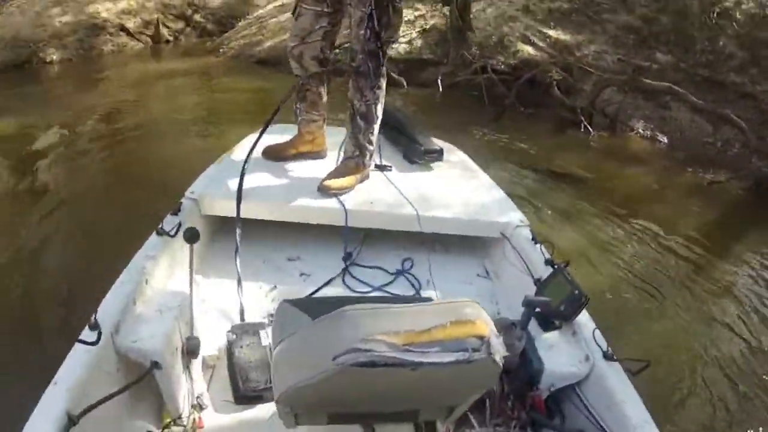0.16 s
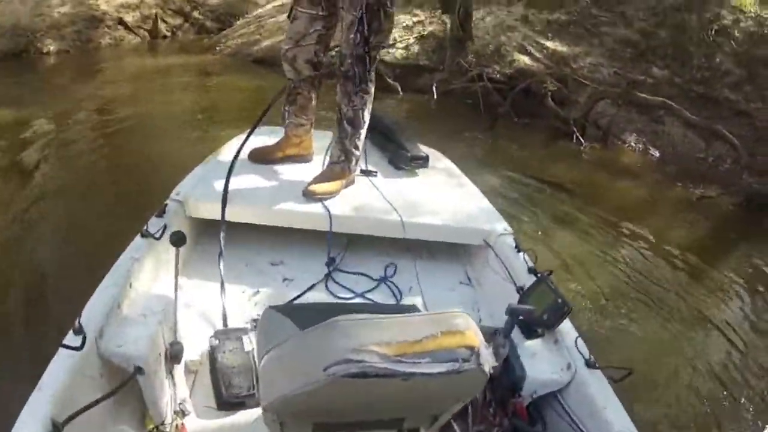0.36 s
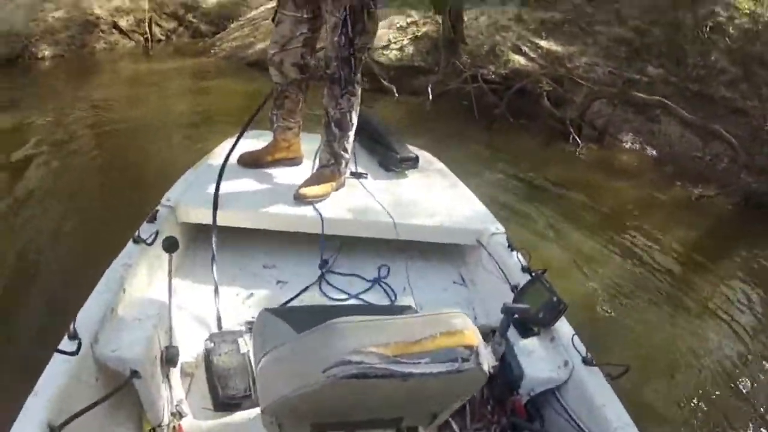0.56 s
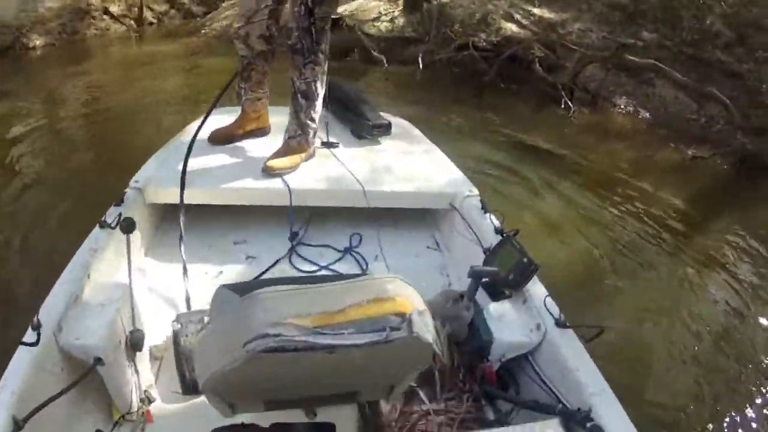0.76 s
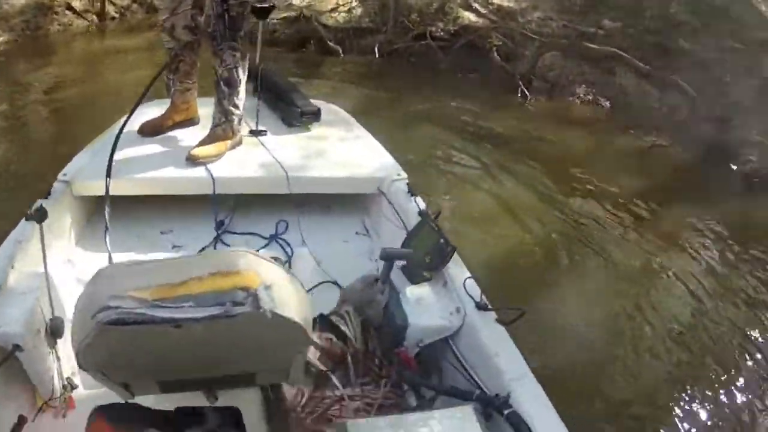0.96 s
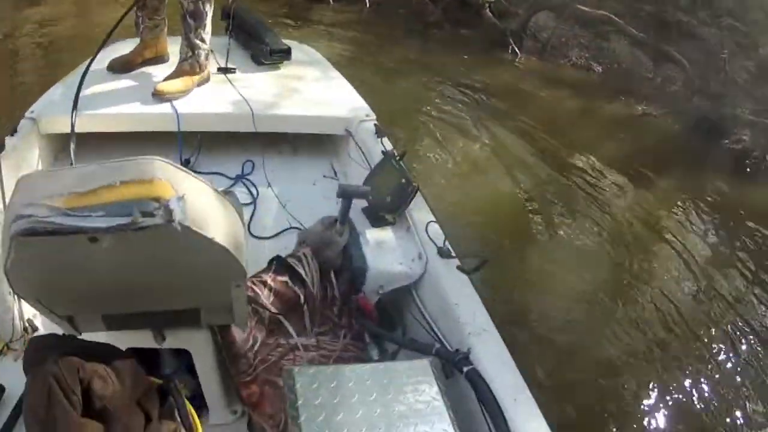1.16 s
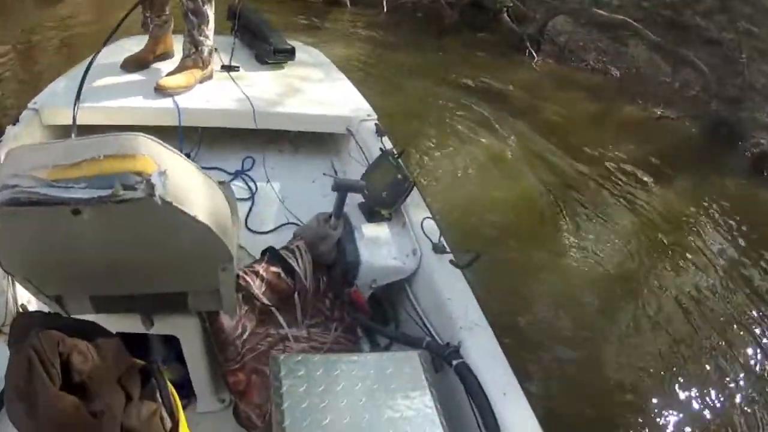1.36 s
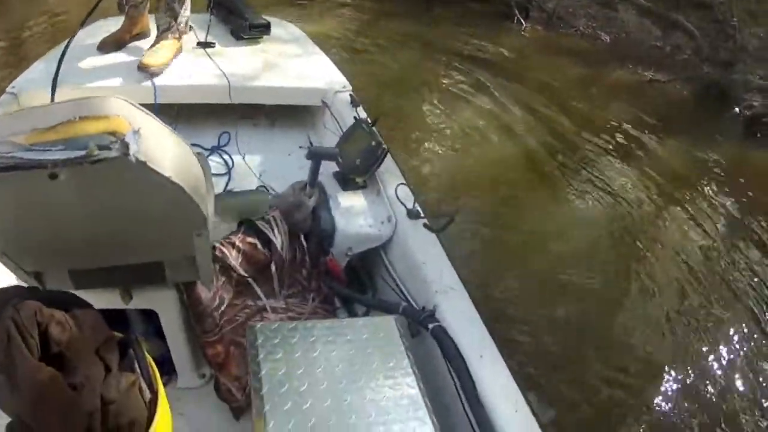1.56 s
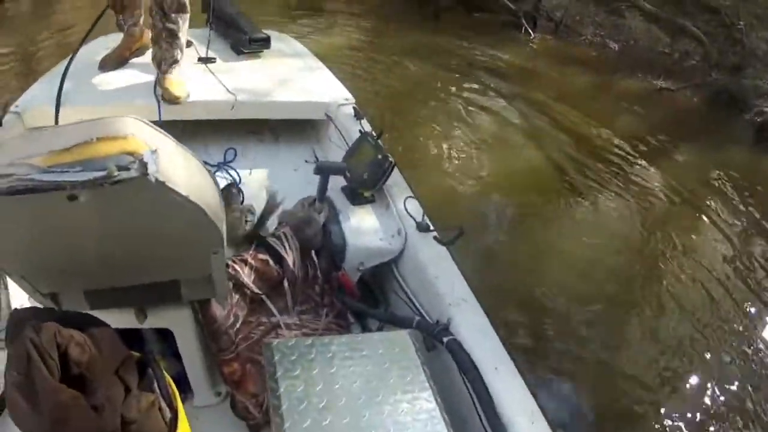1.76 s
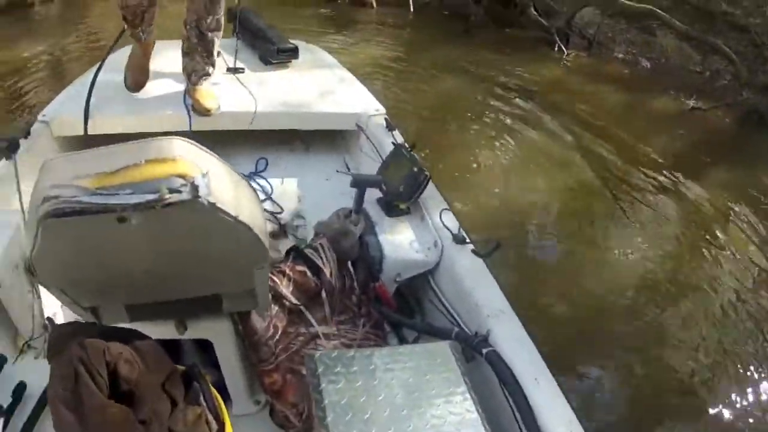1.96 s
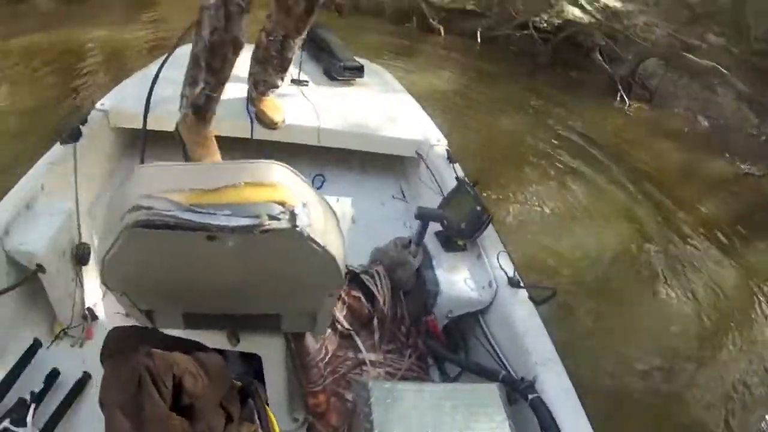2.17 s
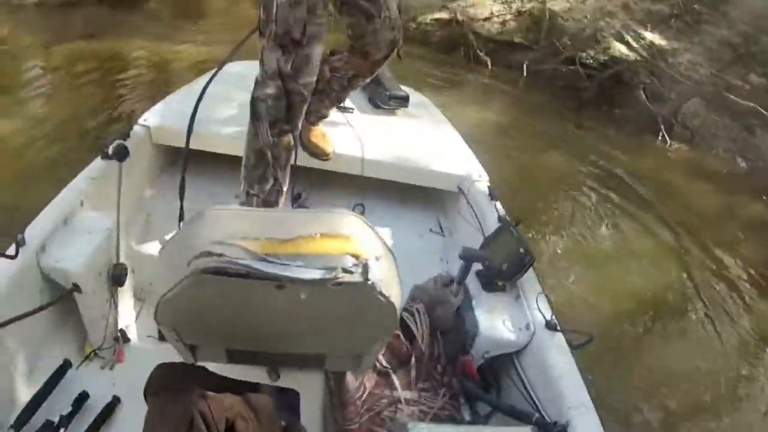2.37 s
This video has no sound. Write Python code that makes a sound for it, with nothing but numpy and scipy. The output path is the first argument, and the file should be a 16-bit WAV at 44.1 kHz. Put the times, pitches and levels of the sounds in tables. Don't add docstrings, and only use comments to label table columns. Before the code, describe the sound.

Loose gear ticks, snaps and knocks in a small boat on a river, in uneven clusters, with low hull thumps and faint lapping; the loudest clack comes near the end, heard through a sealed microphone case.

```python
import sys
import numpy as np
from scipy import signal
from scipy.io import wavfile

SR = 44100
rng = np.random.default_rng(int(sys.argv[2]) if len(sys.argv) > 2 else 0)


def makeup_ratio(level_db):
    decades = np.asarray(level_db, float) / 20
    return 10 ** decades


def dump(signal):
    limited = np.clip(np.atleast_2d(signal).T, -1, 1)
    pcm = np.round(limited * 32767).astype(np.int16)
    wavfile.write(sys.argv[1], SR, pcm)


N = 105840

# f/Hz, width/Hz, level/dB
CASE_RINGS = [(1878, 424, -7.5), (2175, 340, -3.5), (2380, 580, -1), (2643, 746, -7), (3200, 235, -12.5),
              (3510, 224, -10.5), (4080, 600, -24.5), (5132, 900, -23.5)]
# f/Hz, width/Hz, level/dB
HULL_RINGS = [(200, 72.6, 1), (316, 170, -13.5), (486, 119, -11.5), (704, 233, -14), (929, 168, -11.5),
              (1426, 970, -14)]
CASE_MAIN = 6
OWN_FLICKER_DB = 2


def rms_one(x):
    return x / np.sqrt(np.mean(x ** 2) + 1e-20)


def curve_db(rows):
    return np.interp(np.arange(N) / SR, *np.transpose(rows))


def drift(rate):
    hop = 40
    r = np.exp(-2 * np.pi * rate * hop / SR)
    noise = rng.standard_normal(N // hop + 2002)
    slow = signal.lfilter([1], [1, -2 * r, r * r], noise)[2000:]
    return np.interp(np.arange(N) / hop, np.arange(len(slow)), rms_one(slow))


def resonance(x, hz, width_hz):
    r = np.exp(-np.pi * width_hz / SR)
    b = [(1 - r * r) / 2, 0, (r * r - 1) / 2]
    a = [1, -2 * r * np.cos(2 * np.pi * hz / SR), r * r]
    return signal.lfilter(b, a, signal.lfilter(b, a, x))


def body(x, rings, flicker_db=0):
    out = 0
    for k, (hz, width_hz, db) in enumerate(rings):
        gain = makeup_ratio(db + flicker_db * drift(18.7))
        out = out + (-1) ** k * gain * resonance(x, hz, width_hz)
    return out


def grains(crowd=1):
    grains_per_s, spread_db, flicker_db = 1900, 3, 2
    sizes = makeup_ratio(spread_db * np.minimum(rng.exponential(1, N), 4)) * rng.choice([-1, 1], N)
    born = rng.random(N) < crowd * grains_per_s / SR
    clumps = makeup_ratio(flicker_db * (drift(4.5) + 1.44 * drift(38)))
    return rms_one(sizes * born * clumps) + 1e-18


def ticks():
    # t/s, peak/dB, f/Hz, bright part/dB, time to fall 60 dB/s
    tick_table = [(0.0981, -27.5, 2250, -21.5, 0.1), (0.195, -22.5, 2320, -40, 0.067),
                  (0.2073, -13, 2310, -31, 0.042), (0.2244, -11.5, 2460, -27, 0.019),
                  (0.2428, -18, 2350, -35, 0.0089), (0.2592, -14, 1930, -38, 0.075),
                  (0.5116, -20.5, 2030, -42, 0.055), (0.5655, -20, 2134, -36, 0.051),
                  (0.6378, -26.5, 2540, -35, 0.029), (0.7067, -27, 1940, -21, 0.023),
                  (0.7251, -22.5, 2380, -52, 0.033), (0.845, -26, 2720, -26, 0.067),
                  (0.8669, -27.5, 2460, -27, 0.053), (0.9206, -32, 2330, -28, 0.2),
                  (0.9531, -23, 2390, -34.5, 0.13), (1.061, -27, 2320, -43, 0.084),
                  (1.1093, -13, 2370, -42, 0.028), (1.1202, -20.5, 2460, -18, 0.088),
                  (1.3638, -27, 2380, -43, 0.079),
                  (1.4074, -23.5, 2320, -34, 0.089), (1.465, -22, 2390, -33, 0.023),
                  (1.49, -28, 2580, -45, 0.059), (1.5378, -32.5, 2380, -27, 0.12),
                  (1.55, -30, 2440, -52, 0.034), (1.577, -31, 2580, -40, 0.23),
                  (1.6268, -40, 2390, -7, 0.083), (1.6545, -30, 1560, -10, 0.028),
                  (1.691, -23.5, 1600, -27, 0.039), (1.736, -25.5, 2436, -31, 0.059),
                  (1.7974, -29.5, 2520, -25, 0.031), (1.8182, -14, 2450, -35, 0.053),
                  (1.825, -17.5, 2420, -38, .09), (1.9017, -4.5, 2597, -41, 0.027),
                  (1.907, -13.5, 2510, -32, 0.076), (2.0956, -25, 3240, -38, 0.086),
                  (2.126, -30.5, 2170, -24, 0.2), (2.1792, -23, 2410, -26, 0.043),
                  (2.1943, -25, 2760, -44, 0.12), (2.2437, -27, 2450, -28, 0.14),
                  (2.3635, -22.5, 2600, -32, 0.036)]
    attack_s, ring_s, width_hz = 0.0023, 0.018, 670
    tone_db, tail_db, near_db, bright_gain_db = -0.5, -12, -0.5, 13.5
    t = np.arange(SR // 4) / SR
    rise = 1 - np.exp(-t / attack_s)
    tone, rattle, bright = np.zeros((3, N + SR))
    for s, db, hz, bright_db, t60 in tick_table:
        noise = rng.standard_normal(len(t))
        i = int(s * SR)
        span = slice(i, i + len(t))
        ring = makeup_ratio(db + tone_db - 60 * t / ring_s) * rise ** 2
        tone[span] += ring * 2 * np.sin(2 * np.pi * hz * t)
        fall = rise * makeup_ratio(db - 60 * t / max(t60, .01))
        tone[span] += makeup_ratio(tail_db + near_db) * fall * rms_one(resonance(noise, hz, width_hz))
        rattle[span] += noise * fall
        bright[span] += noise * fall * makeup_ratio(bright_db)
    unit = rng.standard_normal(N)
    main, top = CASE_RINGS[:CASE_MAIN], CASE_RINGS[CASE_MAIN:]
    case_part = body(rattle[:N] + 1e-18, main) / np.std(body(unit, main))
    bright_part = body(bright[:N] + 1e-18, top) / np.std(body(unit, top))
    return tone[:N] + makeup_ratio(tail_db) * (case_part + makeup_ratio(bright_gain_db) * bright_part)


def snaps():
    # t/s, peak/dB, hull part/dB, bright part/dB
    snap_table = [(0.0368, -40, -5, -2), (0.0533, -30, -2, -2), (0.0992, -30, -16, 5),
                  (0.1204, -24, -10, 3), (0.2134, -31, -1, 3), (0.2314, -27, 0, 2), (0.2598, -11, -12, -5),
                  (0.2674, -10.5, -21, 3), (0.596, -28.5, -0.5, 5), (0.625, -33, -2.5, 6),
                  (0.6574, -25, -8, 0), (0.7831, -35, -10, -4), (0.8051, -39, -21, -19),
                  (0.845, -33.5, -1, 0), (1.0264, -31, -12, -12), (1.061, -19.5, -17, -3),
                  (1.0979, -25.5, -8, 2), (1.1234, -14.5, -25, 3), (1.1304, -15, -2.5, 0),
                  (1.1464, -22, -17, -5), (1.1822, -38, -15, -4), (1.1954, -42, -20, -14),
                  (1.2456, -30, -4, 11), (1.3443, -28, 0, -13), (1.4087, -14.5, -25, -4),
                  (1.5384, -30, -8, 0), (1.5494, -39, -12, 0), (1.5783, -32, -26, 0), (1.5783, -42, -20, 0),
                  (1.6282, -26, -13, 3), (1.6531, -24.5, 6, 2), (1.6584, -26, -31, -3),
                  (1.6916, -34, 10, 2), (1.7154, -37, 8, 12), (1.7599, -26.5, 4, 4),
                  (1.8254, -16, -4.5, -6), (1.9031, -10, -16, 12.5), (1.9114, -18, -6, 5),
                  (2.0258, -29, -22, -15), (2.0632, -22, -5, -12), (2.1394, -19.5, -7, 2),
                  (2.1799, -28, -5, -5)]
    snap_db, spread_db, bright_top_db = -9, 2.5, 3
    start, peak_db, hull_db, bright_db = np.transpose(snap_table)
    rings = [*CASE_RINGS, *HULL_RINGS[2:]]
    out = 0
    for k, (hz, width_hz, db) in enumerate(rings):
        if k < CASE_MAIN:
            part_db = 0
        elif k < len(CASE_RINGS):
            part_db = np.minimum(bright_db, bright_top_db)
        else:
            part_db = hull_db
        chance_db = rng.normal(0, spread_db, len(start))
        clicks = np.full(N, 1e-18)
        strength = makeup_ratio(peak_db + part_db + chance_db + db + snap_db) * SR / (2 * width_hz)
        clicks[(start * SR).astype(int)] = strength
        out = out + (-1) ** k * resonance(clicks, hz, width_hz)
    return out


def knocks():
    # t/s, peak/dB, f/Hz, time to fall 60 dB/s
    knock_table = [(.135, -41, 680, 0.12), (.262, -33, 780, 0.061), (1.121, -35.5, 680, 0.14),
                   (1.628, -33, 770, 0.049), (1.653, -36, 790, 0.13), (1.357, -36.5, 3350, 0.35),
                   (1.489, -30.5, 3340, 0.03), (1.6, -32, 5300, 0.046), (1.83, -39, 900, 0.15),
                   (1.148, -52, 800, .1), (2.095, -39, 490, 0.13), (2.1, -33.5, 2000, 0.049),
                   (2.245, -40, 714, 0.1)]
    noise_db, width_hz, attack_s = -1.0, 480, 0.00046
    t, out = np.arange(SR // 4) / SR, np.zeros(N + SR)
    for s, db, hz, t60 in knock_table:
        puff = rms_one(resonance(rng.standard_normal(len(t)), hz, width_hz))
        note = np.sin(2 * np.pi * hz * t) + makeup_ratio(noise_db) * puff
        shape = (1 - np.exp(-t / attack_s)) * makeup_ratio(db - 60 * t / max(t60, .01))
        i = int(s * SR)
        out[i:i + len(t)] += note * shape
    return out[:N]


def thumps():
    # t/s, peak/dB, f/Hz, length/s
    thump_table = [(0.102, -41, 83.8, 0.1), (0.224, -15.5, 53.7, 0.053), (0.2625, -13, 83.3, 0.034),
                   (0.334, -20, 70.5, 0.011), (.415, -27.5, 189.5, 0.068), (.635, -36.5, 200, 0.08),
                   (2.092, -32, 200, 0.052), (0.562, -33, 74.5, 0.042), (0.644, -35.5, 78.5, 0.09),
                   (1.045, -27, 83, 0.036), (1.352, -27.5, 92.4, 0.032), (1.4, -26, 101.3, 0.031),
                   (1.477, -32.5, 93, 0.044), (1.6373, -27, 90, 0.049), (1.714, -35, 94, 0.015),
                   (2.082, -33.5, 74.6, 0.035), (2.303, -27.5, 79, 0.035), (2.336, -26.5, 77.5, 0.021)]
    rise_share = 0.28
    t, out = np.arange(SR // 3) / SR, np.zeros(N + SR)
    for s, db, hz, length in thump_table:
        u = t / (rise_share * max(length, .005))
        i = int(s * SR)
        out[i:i + len(t)] += makeup_ratio(db) * u * np.exp(1 - u) * np.sin(2 * np.pi * hz * t)
    return out[:N]


def scrape():
    # t/s, length/s, level/dB, sag/dB
    stroke = [
        (1.627, .088, -43, 4),
    ]
    # f/Hz, width/Hz, level/dB
    scrape_rings = [(750, 600, 0), (1600, 1100, 0), (4300, 350, -13), (5250, 280, -7)]
    s, length, db, sag_db = stroke[0]
    u = np.arange(N) / SR - s
    shape = np.clip(u / 0.0016, 0, 1) * np.exp(-np.maximum(u - length, 0) / 0.0062)
    shape = shape * makeup_ratio(db - sag_db * np.clip(u / length, 0, 1))
    return shape * rms_one(body(grains(crowd=0.92), scrape_rings, 1.1))


def line_zip():
    # t/s, length/s, start f/Hz, end f/Hz, level/dB
    zip_table = [
        (1.04, .014, 5400, 3500, -43),
    ]
    s, length, from_hz, to_hz, db = zip_table[0]
    u = np.clip((np.arange(N) / SR - s) / length, 0, 1)
    phase = 2 * np.pi * np.cumsum(from_hz * (to_hz / from_hz) ** u) / SR
    return makeup_ratio(db) * np.sin(np.pi * u) * np.sin(phase)


def washes():
    # t/s, length/s, level/dB, hull part/dB, sag over the length/dB
    wash_table = [(0.092, 0.051, -39, -8, 7), (0.199, 0.17, -30.5, -3, 1), (0.384, 0.19, -33, 0, 10),
                  (0.624, 0.11, -37, -4, 9), (0.849, 0.023, -44.5, 6, 14), (0.921, 0.077, -44.5, -3.5, 2),
                  (1.087, 0.082, -43.5, -4.5, 5), (1.31, 0.11, -46.5, -1.5, -10.5),
                  (1.461, 0.042, -50.5, 1.5, -5.5), (1.629, 0.11, -51.5, 10, 9),
                  (2.016, 0.094, -45, -2.5, -9), (2.119, 0.086, -38, -8, 9.5),
                  (2.238, 0.035, -51.5, 7.5, 0)]
    tint_db = [10.5, 1.5, 1, -10, 11, 8.5, 3, -1.5]
    rise_s, fall_s = 0.0062, 0.009
    t, (case_level, hull_level) = np.arange(N) / SR, np.zeros((2, N))
    for s, length, db, hull_db, sag_db in wash_table:
        u = t - s
        shape = np.clip(u / rise_s, 0, 1) * np.exp(-np.maximum(u - length, 0) / fall_s)
        shape = shape * makeup_ratio(db - sag_db * np.clip(u / length, 0, 1))
        case_level += shape
        hull_level += shape * makeup_ratio(hull_db)
    water = grains(crowd=1.9) + 0.35 * rng.standard_normal(N)
    tinted = [(hz, w, db + tint) for (hz, w, db), tint in zip(CASE_RINGS, tint_db)]
    case_part = rms_one(body(water, tinted, OWN_FLICKER_DB))
    hull_part = rms_one(body(water + 0.83 * rng.standard_normal(N), HULL_RINGS, OWN_FLICKER_DB))
    return case_level * case_part + hull_level * hull_part


def lapping():
    # t/s, level/dB
    lap_levels = [(0, -50), (.15, -46.5), (.3, -37), (.6, -57.5), (.77, -49), (.91, -50.5), (1.05, -44.5),
                  (1.22, -43.5), (1.3, -42), (1.53, -50.5), (1.6, -51), (1.78, -49), (1.84, -43.5),
                  (1.89, -40.5), (2.0, -47.5), (2.3, -53), (2.4, -42.5)]
    case_db, hull_db, hull_follows, smooth_share = 0.5, -4, 0.6, 0.64
    busy = curve_db(lap_levels)
    water = grains() + smooth_share * rng.standard_normal(N)
    case_part = rms_one(body(water, CASE_RINGS, OWN_FLICKER_DB))
    hull_part = rms_one(body(water + rng.standard_normal(N), HULL_RINGS, OWN_FLICKER_DB))
    hull_busy = busy.mean() + hull_follows * (busy - busy.mean())
    return makeup_ratio(busy + case_db) * case_part + makeup_ratio(hull_busy + hull_db) * hull_part


def rumble():
    # t/s, level/dB
    rocking = [(0, -48.5), (.3, -35.5), (.52, -39), (.8, -39.5), (.92, -41), (1.0, -51), (1.3, -39.5),
               (1.58, -54), (1.7, -44), (1.95, -52), (2.1, -36.5), (2.25, -44), (2.4, -43)]
    # f/Hz, width/Hz, level/dB
    rumble_rings = [(33.1, 13.6, -1), (57.3, 29, -3.5), (90, 15.4, -2.5), (127, 95, -9.5)]
    lumpy = body(rng.standard_normal(N), rumble_rings, 2.0) * makeup_ratio(2.5 * drift(15))
    return makeup_ratio(curve_db(rocking) + 1) * rms_one(lumpy)


def hiss():
    return makeup_ratio(-68) * rng.standard_normal(N)


def scene():
    gear = ticks() + snaps() + knocks() + thumps() + scrape() + line_zip()
    water = washes() + lapping()
    return (gear + water + rumble() + hiss())[None]


def top_cut(x):
    return signal.sosfilt(signal.butter(12, 16470, fs=SR, output="sos"), x)


def record(dry):
    held_rate, repeats = 12000, 4
    dull = signal.sosfilt(signal.butter(8, 5750, fs=SR, output="sos"), dry)
    dull = signal.sosfilt(signal.butter(2, 39, "high", fs=SR, output="sos"), dull)
    dull = signal.lfilter(*signal.iirnotch(4420, 35, fs=SR), dull)
    sampled = signal.resample(dull, N * held_rate // SR, axis=1)
    held = np.repeat(sampled, repeats, axis=1)
    full_rate = signal.resample(held, N, axis=1)
    mix = signal.sosfilt(signal.cheby2(12, 50, 16050, fs=SR, output="sos"), full_rate)
    return top_cut(mix)


dry = scene()
out = record(dry)
dump(out)
```